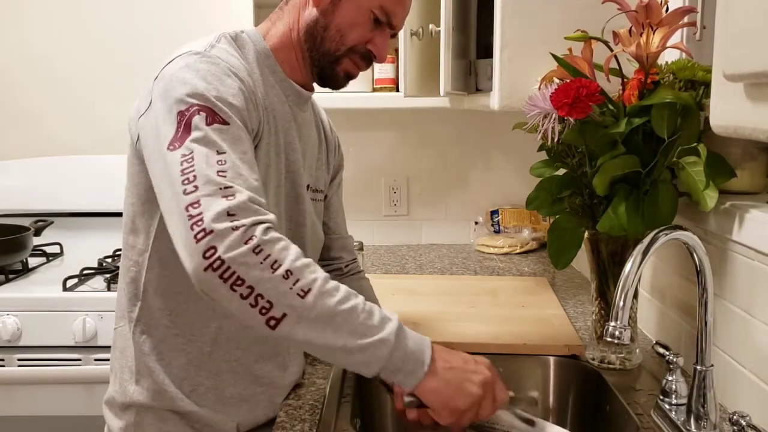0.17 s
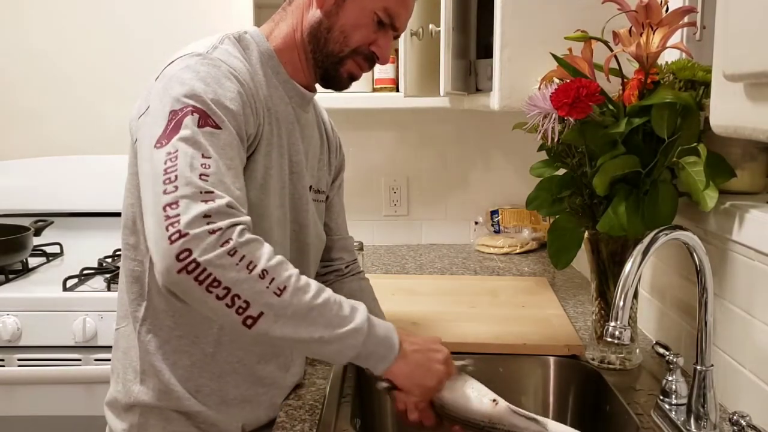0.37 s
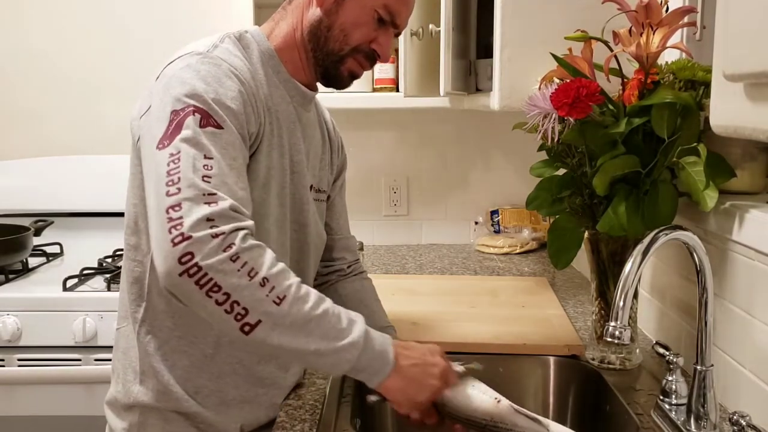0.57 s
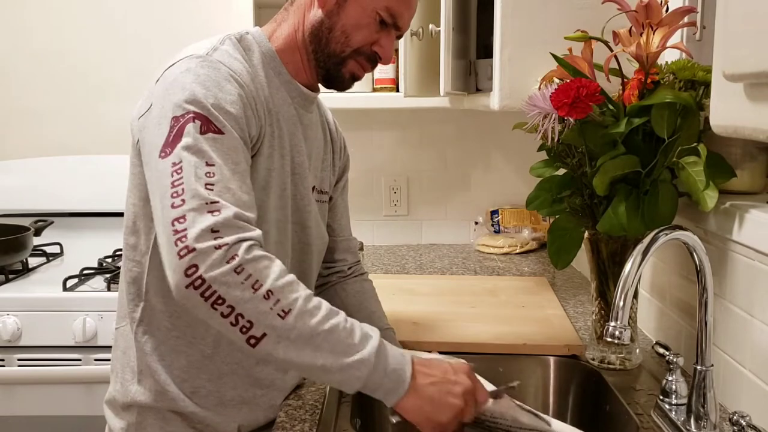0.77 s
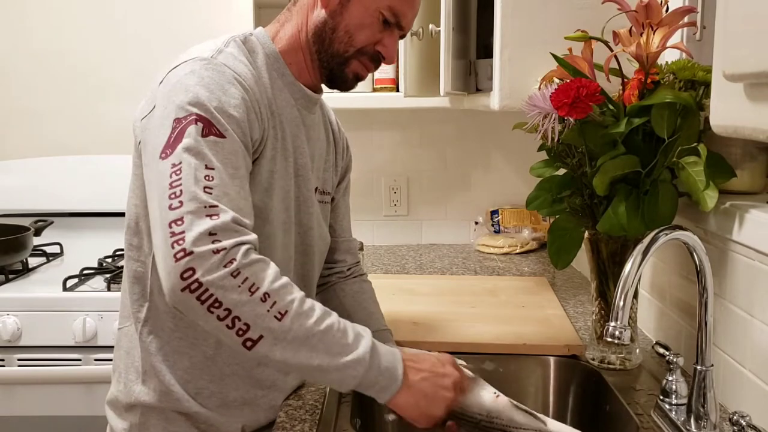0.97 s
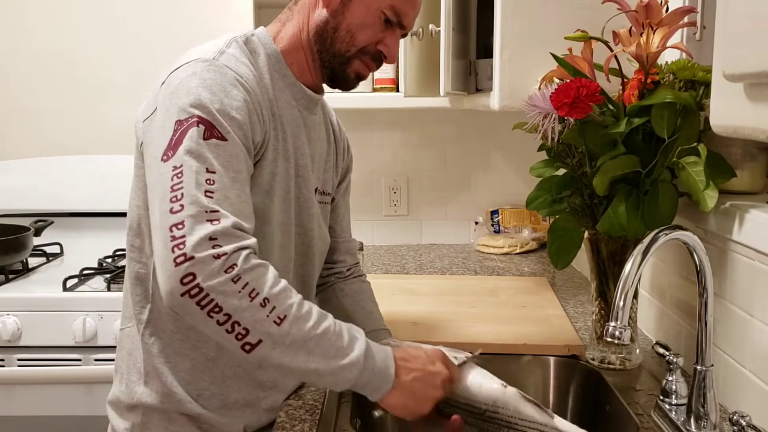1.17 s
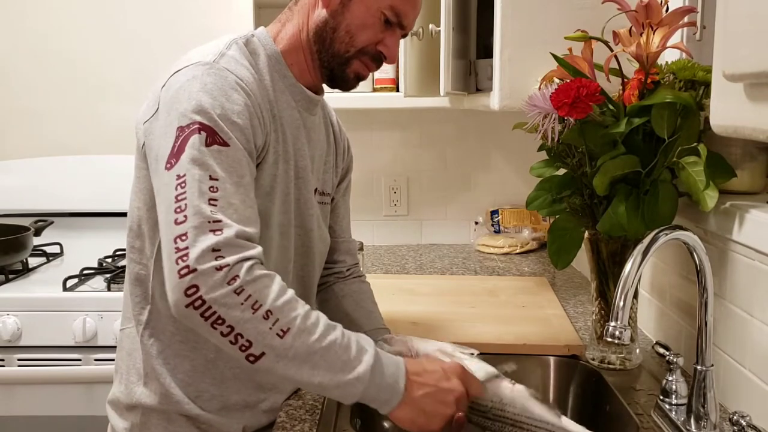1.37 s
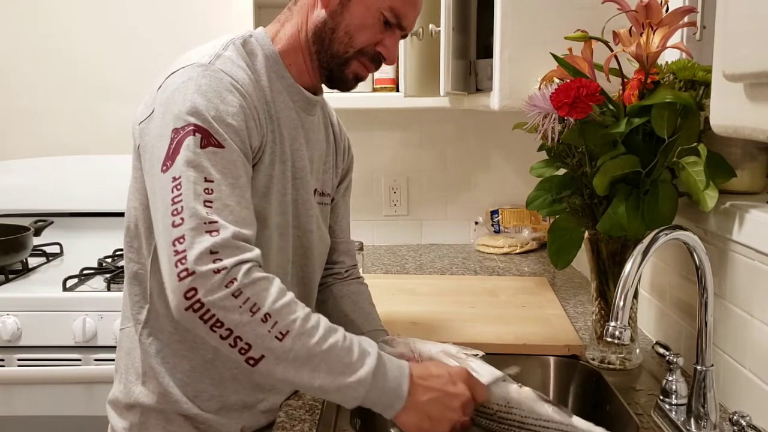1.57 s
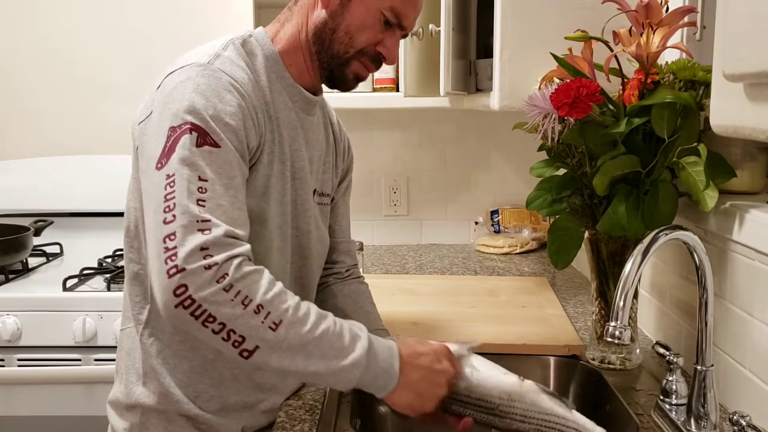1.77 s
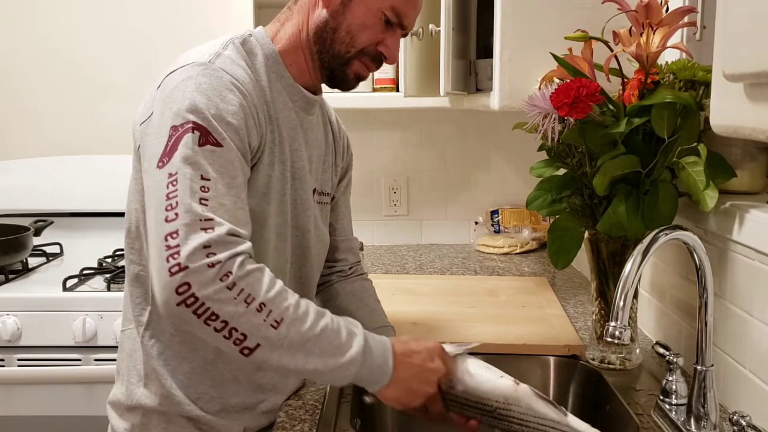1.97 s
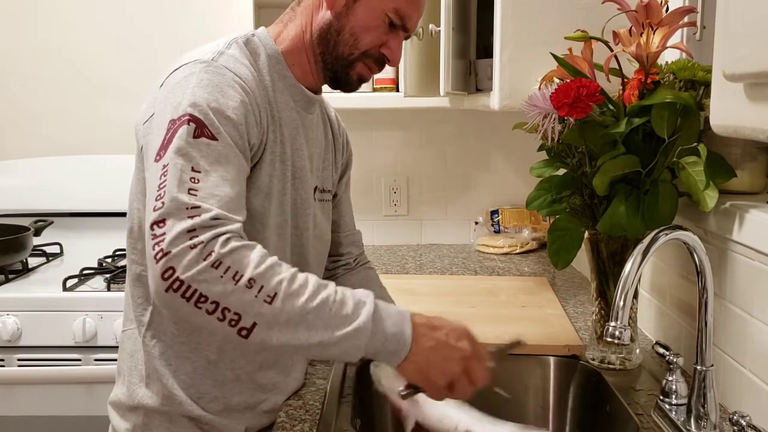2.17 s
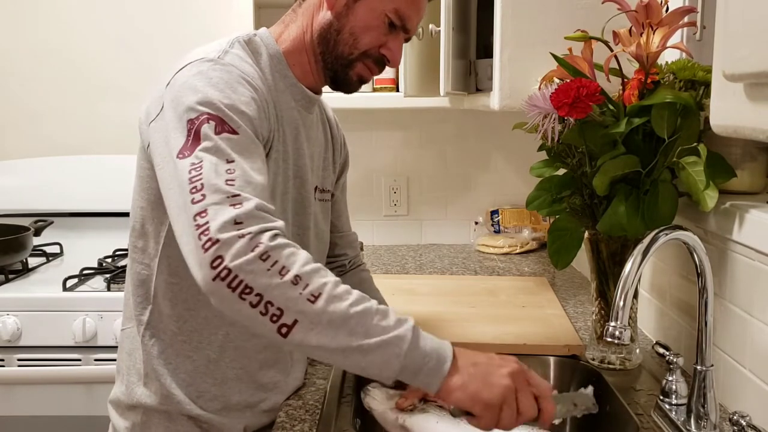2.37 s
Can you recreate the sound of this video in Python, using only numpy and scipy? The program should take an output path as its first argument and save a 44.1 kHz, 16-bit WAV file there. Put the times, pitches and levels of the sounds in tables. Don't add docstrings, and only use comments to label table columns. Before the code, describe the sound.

A knife rasps scales off a fish in quick uneven strokes, scales snapping crisply while the wet body thuds on a steel sink; small tiled kitchen, close stereo microphones, faint fridge hum.

```python
import sys
import numpy as np
from scipy import signal
from scipy.fft import rfft, irfft, next_fast_len
from scipy.io import wavfile
from scipy.ndimage import uniform_filter1d, map_coordinates

SR = 44100
rng = np.random.default_rng(int(sys.argv[2]) if len(sys.argv) > 2 else 0)


def field_ratio(decibels):
    return 10 ** (np.asarray(decibels, dtype=float) / 20)


def digitize_waveform(pressure):
    field = np.atleast_2d(pressure).T
    bounded = np.clip(field, -1, 1)
    quanta = np.round(bounded * 32767).astype(np.int16)
    wavfile.write(sys.argv[1], SR, quanta)


N = 108045

# pitch_hz, level_db (per Hz)
ROOM_TONE = [(35, -21), (60, -8), (300, -14), (550, -18.5), (900, -33), (1500, -46), (2500, -49.5)]
# pitch_hz, level_db (per Hz)
MIC_HISS = [(710, -47), (1200, 3), (1580, -29), (2050, -8), (2220, -8), (3010, -21), (7740, -4),
            (14800, -18), (16500, -14)]
ROOM_TONE_DB, MIC_HISS_DB = -55, -74
# pitch_hz, likeness (0 to 1)
LIKENESS = [(40, 0.86), (90, 1), (170, 0.89), (300, 0.95), (600, 0.51), (1500, 0.13), (10000, 0.015)]
# pitch_hz, t60_s
KITCHEN_DECAY = [(150, 0.56), (800, 0.46), (4000, 0.39), (15000, 0.4)]
KNIFE_WET_DB, BASIN_WET_DB = -0.5, -10

# time_s, level_db
COMPRESSOR_LATE = [(0, -65), (1.7, -66), (2.03, -57.5), (2.1, -50.5), (2.45, -53.5)]
# pitch_hz, level_db
FRIDGE_UPPER = [(161, -68), (276, -78), (320, -73), (549, -78)]
HUM_HZ, HUM_DB, HUM_SWAY_DB = 53.4, -55, 1.2
HUM_TURN = 0.033

# start_s, level_db
PUSHES = [
    (0.292, -38.5),
    (0.601, -63),
    (1.153, -47),
    (1.689, -39.5),
]
# start_s, pitch_hz, level_db
SOFT_KNOCKS = [(0.238, 154, -44), (0.278, 286, -41), (0.284, 376, -43.5), (0.298, 134.5, -35),
               (0.31, 272.6, -32.5), (0.354, 205, -42.5), (0.537, 269, -45), (0.541, 123, -51),
               (0.547, 243, -52), (0.571, 194, -39), (0.595, 391, -48), (0.597, 162, -32.5),
               (0.6, 256.6, -32.5), (0.603, 592, -50.5), (0.639, 294, -47), (0.645, 198, -38),
               (0.728, 157, -45.7), (0.874, 190, -39.5), (0.917, 275, -46), (0.923, 376, -50),
               (1.097, 263, -39.5), (1.125, 148, -34), (1.126, 235, -37.5), (1.14, 161.3, -30),
               (1.177, 283, -35.8), (1.184, 159, -47), (1.403, 237, -26.5), (1.417, 395, -40.5),
               (1.427, 257, -27.5), (1.434, 171, -30.5), (1.447, 612, -41.5), (1.51, 196, -47),
               (1.543, 178, -45), (1.656, 161, -31), (1.667, 264, -27), (1.703, 173, -36.5),
               (1.711, 267, -32.5), (1.731, 380, -41.5), (1.784, 177, -48.5), (1.916, 253, -34),
               (1.936, 212, -30.5), (1.977, 166, -35), (2.044, 182, -42.2), (2.092, 155, -53),
               (.315, 200, -38),
    (.892, 250, -38),
    (.905, 272, -39),
    (1.155, 110, -41),
    (1.683, 205, -36),
    (1.918, 160, -34),
    (1.955, 265, -35),
]
# start_s, length_s, low_db, middle_db, high_db
JUDDERS = [
    (.29, 0.038, -43.5, -44.5, -48),
    (0.561, 0.051, -37, -49, -48),
    (0.863, 0.073, -57, -47.5, -41.5),
    (1.113, 0.097, -39, -43.5, -45.5),
    (1.387, 0.065, -39, -40, -49),
    (1.65, 0.08, -41, -47, -40.5),
    (1.914, 0.098, -42.5, -40.5, -44.5),
]
JUDDER_PER_S, JUDDER_DB = 110, -9
# pitch_hz, level_db, t60_s
LOW_MODES = [(156.6, 14.5, 0.11), (175, -3.5, 0.14), (128, -4, 0.08)]
# pitch_hz, level_db, t60_s
MIDDLE_MODES = [(206.8, 7, 0.034), (244, -0.5, 0.088), (404, -11, 0.21)]
# pitch_hz, level_db, t60_s
HIGH_MODES = [(273.4, -3.5, 0.2), (378, -10, 0.24), (574, -7.5, 0.079), (625, -31, 0.078)]
BOOM_LAG_S = 0.000053

# pitch_hz, level_db (per Hz)
WET_BODY = [(350, 5.5), (600, 5.5), (1200, 0.5), (2200, 1), (3200, -19)]
WET_BODY_DB = -15

# start_s, length_s, pitch_hz, level_db
BLADE_SINGS = [(.125, 0.045, 7400, -77), (.16, .015, 4130, -69), (0.173, 0.014, 7400, -65),
               (.205, 0.024, 5530, -51.5), (0.212, 0.017, 3270, -47.5), (0.554, 0.021, 3100, -56),
               (0.609, 0.061, 4900, -59), (0.713, 0.033, 3210, -62.5), (0.847, 0.041, 3100, -53),
               (1.175, 0.013, 7000, -38), (0.217, 0.018, 4240, -48), (1.683, 0.004, 4400, -45),
               (1.368, 0.02, 4760, -49.5), (1.921, 0.019, 2730, -52), (2.191, 0.049, 1730, -70)]
# start_s, peak_db, brightness_db_per_octave
SCALE_SNAPS = [(0.2044, -26, -2), (0.2182, -25, -3.5), (0.2277, -30, 5), (0.3185, -25, 6), (0.529, -22, 6),
               (0.5833, -14, 3), (0.855, -26, 0.5), (1.105, -39, -9), (1.1093, -30, 12), (1.1301, -8, 3.5),
               (1.172, -16, 1.5), (1.1867, -15, 5.5), (1.3722, -36, -4), (1.3983, -15, 14),
               (1.6385, -44, 3), (1.6422, -34, 17), (1.6693, -25.5, -4.5), (1.677, -23, 15),
               (1.6867, -23.5, -5), (1.7102, -31, 4), (1.726, -24, 3), (1.411, -18.5, 8),
               (1.417, -24.5, -5.5), (1.927, -26, 3), (2.0054, -20, 4), (2.1515, -35, 9),
               (2.4454, -47.5, -17)]
# start_s, rise_s, hold_s, level_db,
# brightness_db_per_octave
BLADE_PASSES = [(0, 0.0011, 0.024, -68.5, -1.5), (0.048, 0.016, 0.048, -85, -5),
                (0.162, 0.048, 0.025, -50.5, -1.5), (0.198, 0.0056, 0.038, -46.5, -7),
                (0.252, 0.031, 0.052, -47, -3), (0.374, 0.025, 0.024, -60, -4),
                (0.438, 0.047, 0.044, -66.5, -3), (0.532, 0.0018, 0.028, -48, -3.5),
                (0.573, 0.021, 0.02, -41, 2.5), (0.702, 0.02, 0.012, -53, -3),
                (0.824, 0.018, 0.014, -51.5, -1), (0.848, 0.02, 0.039, -38.5, 0),
                (0.959, 0.014, 0.043, -58, -4), (1.072, 0.038, 0.0063, -47.5, -2.5),
                (1.098, 0.035, 0.027, -36, 0.5), (1.161, 0.0065, 0.033, -38, -1.5),
                (1.272, 0.012, 0.05, -53.5, -1.5), (1.363, 0.012, 0.021, -45, -1.5),
                (1.393, 0.0065, 0.056, -40, -1), (1.525, 0.027, 0.044, -50, -1),
                (1.636, 0.0092, 0.053, -48, 1), (1.664, 0.013, 0.052, -36.5, -1),
                (1.78, 0.05, 0.19, -53, -0.5), (1.918, 0.004, 0.058, -38, -1),
                (2.003, 0.008, 0.0088, -43.5, 2.5),
                (2.137, 0.011, 0.048, -57, -3),
    (2.188, 0.015, 0.056, -66.5, -4),
]
# pitch_hz, level_db (per Hz)
RASP_SPECTRUM = [(290, -69), (500, 1.5), (2010, -18), (3500, -8), (7380, -2), (9190, -4), (14900, -0.5),
                 (15800, -11), (16500, -23)]
# pitch_hz, width_hz, level_db
BLADE_PEAKS = [(3100, 1420, 6), (4660, 1650, 2), (7750, 880, 3.5), (11100, 3000, 3)]


def unit(x):
    return x / np.sqrt(np.mean(x ** 2) + 1e-20)


def along(points, hz):
    f, v = np.transpose(points)
    return np.interp(np.log(hz + 1), np.log(f + 1), v)


def wobble(rate):
    knots = rng.standard_normal(int(N * rate / SR) + 4)
    return map_coordinates(knots, [np.arange(N) * rate / SR])


def filtered(x, response):
    n = x.shape[-1]
    m = next_fast_len(n + 4096)
    return irfft(rfft(x, m) * response(np.fft.rfftfreq(m, 1 / SR)), m)[..., :n]


def add(into, s, x):
    part = into[..., round(s * SR):][..., :x.shape[-1]]
    part += x[..., :part.shape[-1]]


def spread(pair):
    def mid_side_gains(hz):
        turn = np.arccos(np.clip(along(LIKENESS, hz), -1, 1)) / 2
        return np.array([np.cos(turn), np.sin(turn)])
    mid, side = filtered(pair, mid_side_gains)
    return np.array([mid + side, mid - side])


def air():
    def bed(points):
        noise = rng.standard_normal((2, N))
        return unit(spread(filtered(noise, lambda hz: field_ratio(along(points, hz)))))
    return field_ratio(ROOM_TONE_DB + 0.089 * wobble(2.6)) * bed(ROOM_TONE) + field_ratio(MIC_HISS_DB) * bed(MIC_HISS)


def fridge():
    t = np.arange(N) / SR
    side = np.array([[1], [-1]]) * HUM_TURN / (2 * np.pi)

    def line(hz, db, sway_db):
        level = np.sqrt(2) * field_ratio(db + sway_db * wobble(5.28))
        drift = hz / HUM_HZ * 0.027 * wobble(5.4)
        return level * np.sin(2 * np.pi * (hz * t + rng.random() + side + drift))

    hum = line(HUM_HZ, HUM_DB, HUM_SWAY_DB)
    late = line(82.5, np.interp(t, *np.transpose(COMPRESSOR_LATE)), sway_db=-3.0)
    return hum + late + sum(line(hz, db, sway_db=5.5) for hz, db in FRIDGE_UPPER)


def kitchen(x):
    out, step = np.zeros((2, N)), SR // 16
    for i in range(0, N, step):
        hz, t, z = signal.stft(rng.standard_normal((2, SR * 3 // 4)), SR, nperseg=256)
        decay = field_ratio(-60 * t / along(KITCHEN_DECAY, hz)[:, None])
        tail = signal.istft(z * decay, SR, nperseg=256)[1]
        tail = tail / np.linalg.norm(tail[0])
        add(out, i / SR + .004, signal.fftconvolve(x[None, i:i + step], tail, axes=1))
    return spread(out)


def thuds():
    out, t = np.zeros(N), np.arange(SR // 2) / SR
    for s, db in PUSHES:
        swing = (1 - np.exp(-t / 0.0073)) * np.sin(2 * np.pi * 90.6 * t)
        add(out, s, field_ratio(db - 60 * t / 0.3) * swing)
    return out


def knocks():
    rise_s, t60_s, level_db, wander, pan_db = 0.0074, 0.11, 2.5, 0.053, 2.5
    out, t = np.zeros((2, N)), np.arange(SR // 4) / SR
    events = SOFT_KNOCKS
    draws = rng.uniform(-1.067, 1, (len(events), 3))
    for (s, hz, db), (turn, bend, pan) in zip(events, draws):
        phase = hz * t * (1 + wander * bend * t / t60_s) + turn
        swell = field_ratio(db + level_db - 60 * t / t60_s) * (1 - np.exp(-(t / rise_s) ** 2))
        sides = field_ratio(pan_db * pan * np.array([[1], [-1]]))
        add(out, s, sides * swell * np.sin(2 * np.pi * phase))
    return out


def basin():
    out, t = np.zeros(N), np.arange(SR // 2) / SR

    def ring(modes):
        soft_start = 1 - np.exp(-t / 0.0028)
        return sum(field_ratio(db - 60 * t / t60) * np.sin(2 * np.pi * hz * t) * soft_start for hz, db, t60 in modes)

    rings = [ring(modes) for modes in (LOW_MODES, MIDDLE_MODES, HIGH_MODES)]
    for s, length, *levels in JUDDERS:
        jitter, size, sign = rng.random((16, 3)).T
        at = (np.arange(16) + jitter) / JUDDER_PER_S
        force = np.clip((length - at) / 0.012, 0, 1) * np.clip(1.24 + at / 0.08, 0, 1)
        blows = np.sign(sign - .5) * field_ratio(12 * size) * force
        train = np.bincount((at * SR).astype(int), blows, len(t))
        for db, r in zip(levels, rings):
            rung = signal.fftconvolve(train, r)[:len(t)]
            add(out, s, field_ratio(db) * rung / np.std(rung[:SR // 10]))
    return out


def flesh():
    out, t = np.zeros((2, N)), np.arange(SR // 4) / SR
    for s, length, *levels in JUDDERS:
        noise = rng.standard_normal((2, len(t)))
        wet = unit(filtered(noise, lambda hz: field_ratio(along(WET_BODY, hz))))
        fall_db = -60 * np.clip(t - length, 0, None) / 0.13
        add(out, s, field_ratio(max(levels) + WET_BODY_DB + fall_db) * np.clip(t / 0.0086, 0, 1) * wet)
    return out * field_ratio(3.56 * wobble(90))


def sings():
    out, t = np.zeros((2, N)), np.arange(SR // 8) / SR
    q = 9
    for s, length, hz, db in BLADE_SINGS:
        noise = rng.standard_normal((2, len(t)))
        band = filtered(noise, lambda f: 1 / (1 + (2 * q * (f - hz) / hz) ** 2))
        fall_db = -60 * np.clip(t - length, 0, None) / 0.039
        add(out, s, field_ratio(db + fall_db) * np.clip(t / 0.0018, 0, 1) * unit(band))
    return out


def colour(tilt_db):
    def response(hz):
        peaks = sum(db / (1 + (2 * (hz - c) / w) ** 2) for c, w, db in BLADE_PEAKS)
        tilt = tilt_db * np.log2(np.maximum(hz, 1800) / 7000)
        low_cut = hz ** 4 / (hz ** 4 + 800 ** 4)
        return field_ratio(along(RASP_SPECTRUM, hz) + peaks + tilt) * low_cut
    return response


def snaps():
    rise_s, t60_s, level_db = 0.0012, 0.022, -9.5
    out, t = np.zeros((2, N)), np.arange(SR // 20) / SR
    for s, db, tilt_db in SCALE_SNAPS:
        burst = unit(filtered(rng.standard_normal((2, len(t))), colour(tilt_db)))
        add(out, s, field_ratio(db + level_db - 60 * t / t60_s) * np.clip(t / rise_s, 0, 1) * burst)
    return out


def clumped(x, depth_db):
    z = signal.stft(x, nperseg=128)[2]
    field = uniform_filter1d(rng.standard_normal(z.shape[1:]), size=5, axis=0)
    field = uniform_filter1d(field, size=7, axis=1)
    return signal.istft(z * field_ratio(depth_db * unit(field)), nperseg=128)[1][:, :N]


def rasp(share=0.34, crack_db=1.0, flutter_db=1):
    rise_from_db, lift_t60_s = -11.5, 0.084
    out, t = np.zeros((2, N)), np.arange(SR // 2) / SR
    for s, rise, hold, db, tilt_db in BLADE_PASSES:
        chance = rng.random(len(t))
        size = rng.exponential(1, len(t))
        kick, hiss = rng.standard_normal((2, 2, len(t)))
        cracks = unit((chance < .04) * kick * field_ratio(crack_db * np.minimum(size, 3)))
        grain = unit(filtered(share * cracks + (1 - share) * hiss, colour(tilt_db)))
        rise_db = rise_from_db * np.clip(1 - t / rise, 0, 1)
        lift_db = -60 * np.clip(t - rise - hold, 0, None) / lift_t60_s
        add(out, s, field_ratio(db + rise_db + lift_db) * np.clip(t / rise / 0.16, 0, 1) * grain)
    return clumped(out, depth_db=3) * field_ratio(flutter_db * wobble(70) - 1.05)


def scene():
    knife = rasp() + snaps() + sings() + flesh()
    boom = field_ratio(JUDDER_DB) * basin() + knocks() + thuds()
    room = kitchen(field_ratio(KNIFE_WET_DB) * knife[0] + field_ratio(BASIN_WET_DB) * boom[0])
    sides = np.array([[1], [-1]])
    booms = filtered(boom, lambda hz: np.exp(1j * np.pi * hz * BOOM_LAG_S * sides))
    mix = spread(knife) * field_ratio(1.5) + room + booms + fridge() + air()
    return mix * field_ratio(0.23 * sides)


def band_limit(x):
    return signal.sosfilt(signal.butter(12, 16810, fs=SR, output="sos"), x)


def record(dry):
    mix = filtered(dry, lambda hz: hz < 15850)
    return band_limit(mix)


dry = scene()
out = record(dry)
digitize_waveform(out)
```